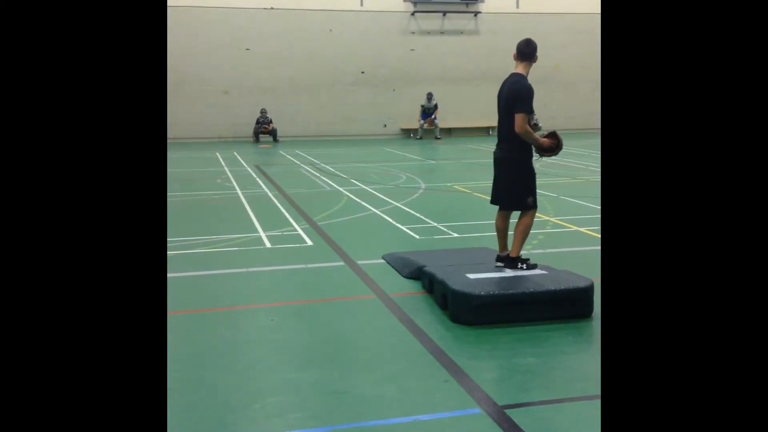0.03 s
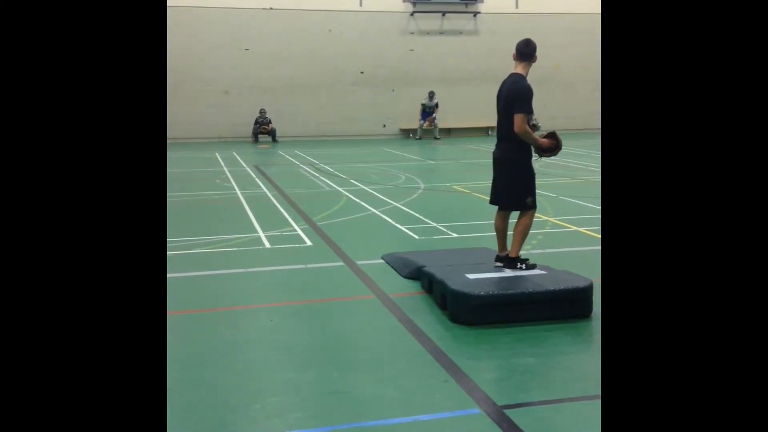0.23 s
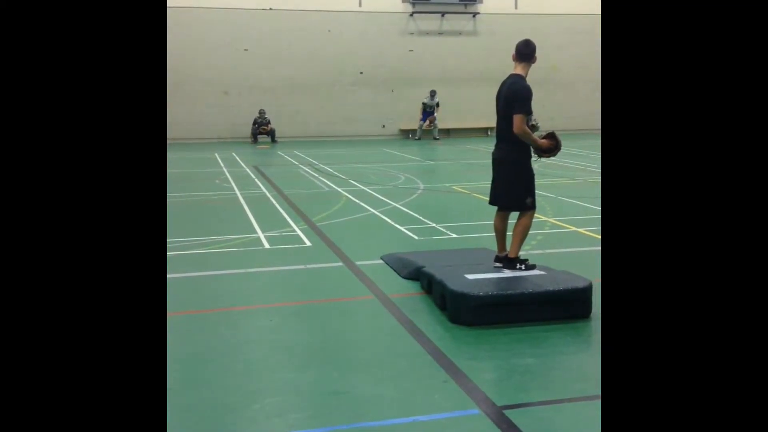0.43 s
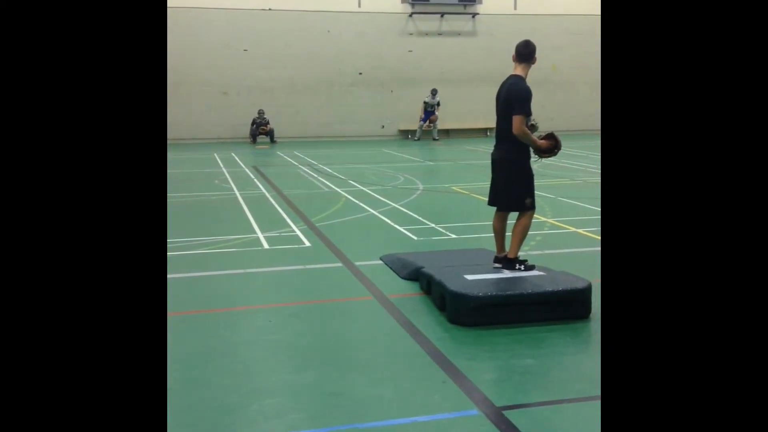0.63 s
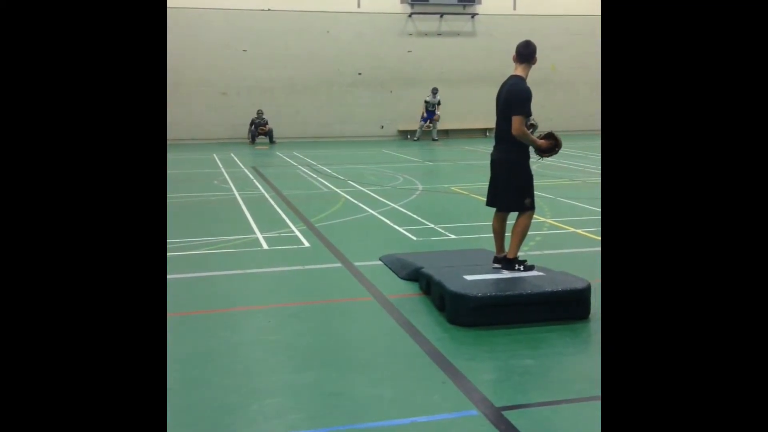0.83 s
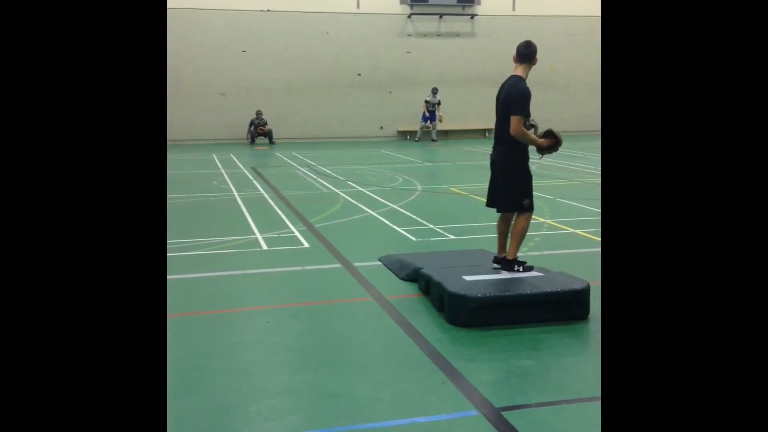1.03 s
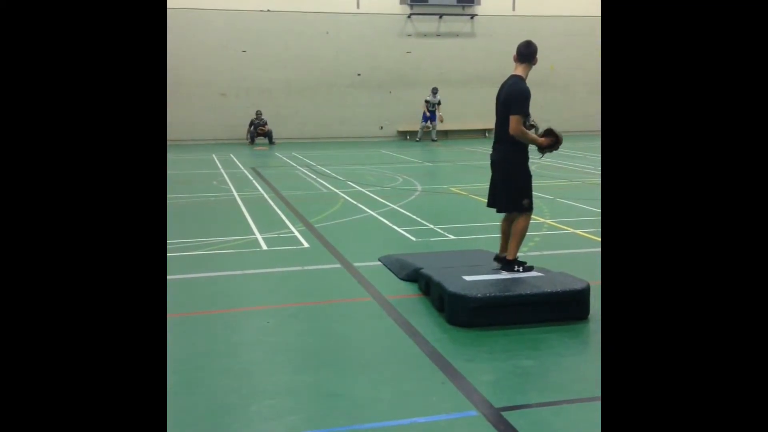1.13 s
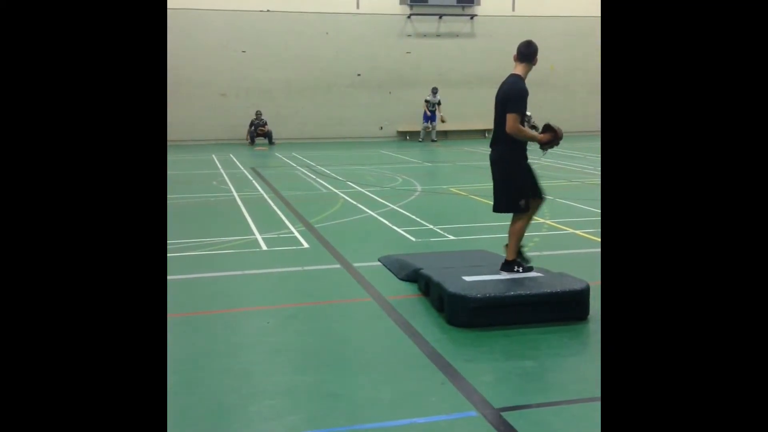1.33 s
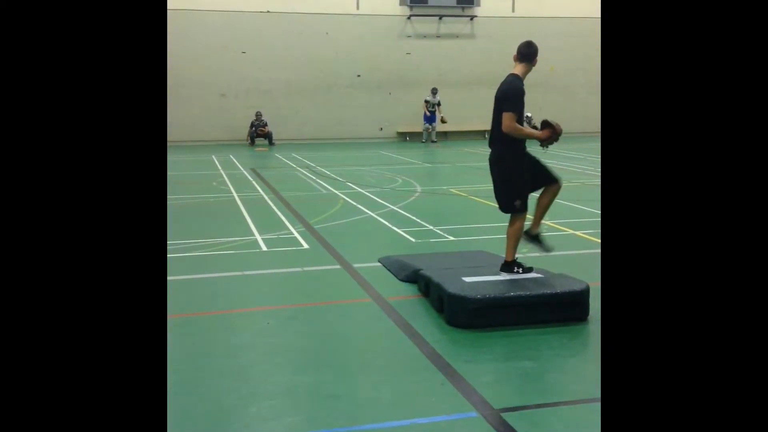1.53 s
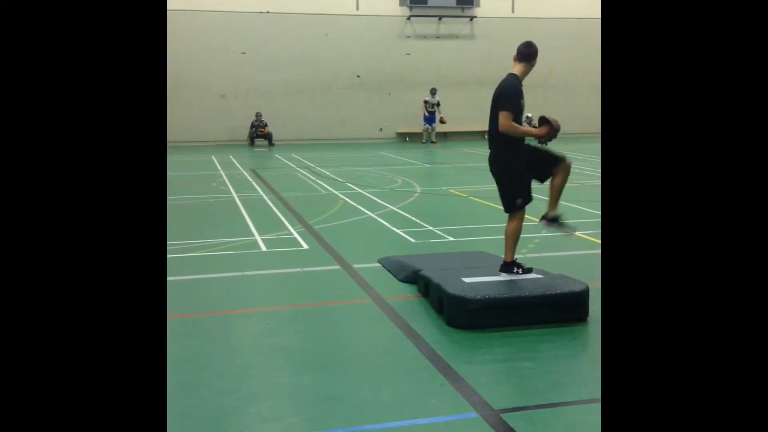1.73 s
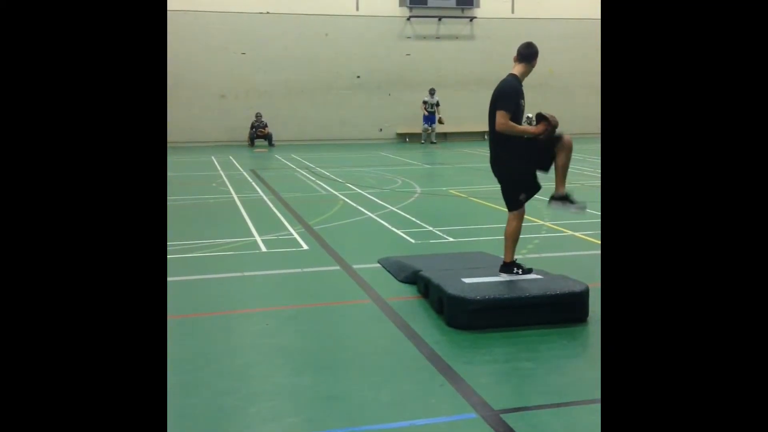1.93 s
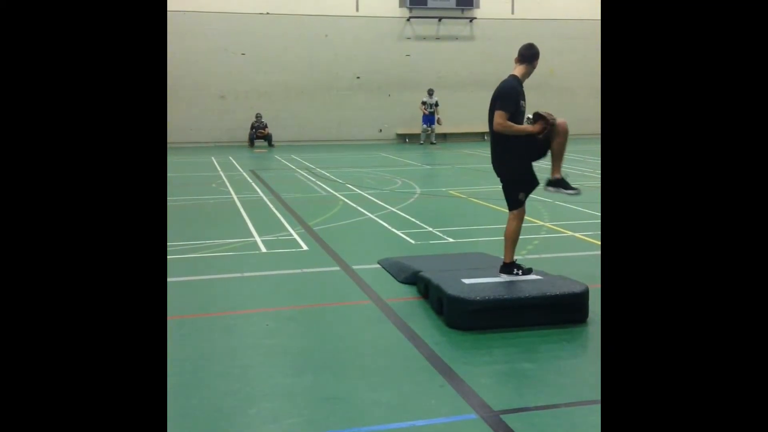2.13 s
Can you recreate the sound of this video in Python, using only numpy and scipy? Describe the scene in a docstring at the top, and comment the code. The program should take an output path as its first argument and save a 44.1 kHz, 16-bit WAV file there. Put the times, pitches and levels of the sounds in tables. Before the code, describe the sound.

A hard ball smacks into something close to the microphone with one sharp crack. Duller echoes come back from the walls of a large gym, which rings on while faint ticks sound over a low room rumble.

```python
"""Faint ticks over a low rumble, then a hard ball smacks into something close to the microphone in a
large gym: a crack and a second slap just after it, both ringing the struck thing's damped modes.
The walls throw the crack back, duller from far off, and the hall rings for seconds, the treble dying
first and the bass swelling late. The players' small knocks and rustling clothes sit low underneath.
One microphone; the recorder rounds off the peaks and cuts the top treble."""
import sys
import numpy as np
from scipy import signal
from scipy.fft import rfft, irfft
from scipy.io import wavfile
from scipy.ndimage import uniform_filter1d

SR = 44100
rng = np.random.default_rng(int(sys.argv[2]) if len(sys.argv) > 2 else 0)


def inscribe(sig):
    """Save sig as 16-bit PCM at rate SR to the path in sys.argv[1].

    A 1-D sig is mono; a 2-D sig holds one channel per row.
    Samples are clipped to [-1, 1] before scaling.
    """
    pcm = np.round(np.clip(np.atleast_2d(sig).T, -1, 1) * 32767)
    wavfile.write(sys.argv[1], SR, pcm.astype(np.int16))


N = 97020

# blows of the ball, close up, and how hard each drives the modes in four registers
# (time [s], crack level [dB], crack t60 [s], thud [dB], body [dB], knock [dB], ring [dB])
BLOWS = [(0.204, -16.5, 0.025, -27.5, -27.5, -19.5, -34.5), (0.2059, -10, 0.043, -22, -8, -19, -28.5),
         (.2178, -21, 0.025, -19, -31, -19, -19.5), (.2200, -14.5, 0.044, -12.5, -22.5, -19, -20)]
# centres of those registers (thud [Hz], body [Hz], knock [Hz], ring [Hz])
REGISTER_HZ = [140, 400, 1150, 3000]
# modes of the struck thing (frequency [Hz], level [dB], t60 [s])
STRUCK_MODES = [(89, -9, 0.032), (146, -0.5, 0.072), (376, 1.5, 0.07), (418.4, -6, 0.067),
                (672, -5.5, 0.076), (882, -11, 0.046), (1128, 3.5, 0.03), (1490, -7, 0.033),
                (1779, -6.5, 0.041), (2894, 0, 0.023), (3036, -5.5, 0.044), (4210, -15.5, 0.044),
                (5486, -20, 0.039)]
# colour of the crack (frequency [Hz], relative level [dB])
CRACK_SPECTRUM = [(30, -24), (120, 1), (300, 3.5), (700, -1.5), (1300, -1.5), (2100, -13), (3400, -9.5),
                  (5000, -18), (7600, -21.5)]
# the two slaps as they leave for the walls (time [s], level [dB], t60 [s])
SLAPS = [(0.2043, -12, 0.017), (0.2194, -14, 0.017)]
# wall echoes, near to far (delay [s], gain [dB], treble edge [Hz])
WALL_ECHOES = [(.058, -25.5, 6000), (.0685, -10.5, 3000), (0.078, -18.5, 3000), (0.125, -12.5, 2200),
               (0.214, -17.5, 1800), (.256, -8.5, 2500), (0.414, -15.5, 1400), (0.517, -13.5, 1600),
               (0.539, -14, 1200), (0.766, -18.5, 1300), (0.789, -16.5, 1300), (1.305, -22.5, 1200)]
# ring of the hall (frequency [Hz], relative starting level [dB], t60 [s])
HALL_BANDS = [(25, -23, 3.4), (45, -22.5, 1.7), (65, 4.5, 11), (88, 7, 8.5), (143, 1, 8.8), (204, -5, 5.6),
              (254, -6, 9), (350, -3.5, 9.5), (515, -10, 6.5), (850, -15, 7.6), (1065, -9, 5.18),
              (1500, -16.5, 5.12), (2120, -20.5, 3.37), (2830, -17.5, 1.55), (4130, -20.5, 1.04),
              (5300, -24, 0.85), (7940, -23.5, 0.48)]
# swell and sink of the hall's bass (time [s], gain [dB])
BASS_SWELL = [(.25, -5), (.31, -9), (.38, -8.5), (.46, -1.5), (.52, 1), (.59, 0.5), (.74, 3.5), (.84, 0.5),
              (.97, -4), (1.06, 0.5), (1.15, 5), (1.37, 0), (1.49, 5), (1.61, -1.5), (1.85, -0.5),
              (1.98, 2.5), (2.2, 6)]
# players' ticks and knocks (time [s], level [dB], centre [Hz], t60 [s], relative broadband click [dB])
TICKS = [(0.0443, -44.5, 1400, .02, -24.5), (0.056, -57, 1400, .025, -19), (0.112, -50, 1400, .025, -23),
         (0.155, -64.5, 4840, .012, -20), (1.205, -54, 3700, .015, -19), (1.2187, -48, 3100, .02, -13),
         (1.7683, -33, 1150, .025, -47.5)]
# rustles of clothing (time [s], level [dB], half length [s])
RUSTLES = [(0.062, -76, 0.022), (0.964, -75, 0.054), (1.222, -72, 0.014), (1.397, -75.5, .07),
           (1.72, -76, .035)]
# rumble and hiss of the room (frequency [Hz], relative level [dB])
ROOM_SPECTRUM = [(20, -20.5), (45, 0), (90, 11.5), (180, -4), (380, 2), (600, -7), (1200, -14),
                 (2000, -28.5), (3000, -35.5), (5000, -38), (7600, -40)]

ECHO_LOW_HZ, SCATTER_T60_S, SCATTER_DB = 277, 0.036, -4.5
HALL_DB, HALL_ONSET_S, HALL_RISE_S = -36.5, 0.225, 0.047
BASS_EDGE_HZ, PATCHY_DB, FLUTTER_DB = 160, 1, 0.54
TICK_WIDTH_OCT, TICK_ROOM_DB, TICK_ROOM_T60_S = 0.31, -4, 0.73
ROOM_DB, CEILING_DB, TREBLE_CUT_HZ = -48, -1.5, 7730


def ball_impact():
    """Close to the microphone, each blow makes a short crack and rings the same damped modes."""
    t, out = np.arange(SR // 4) / SR, np.zeros(N)
    for start, crack_db, crack_t60, *register_db in BLOWS:
        add(out, start, amp(crack_db) * crack(crack_t60))
        for hz, db, t60 in STRUCK_MODES:
            drive_db = np.interp(np.log(hz), np.log(REGISTER_HZ), register_db)
            mode = -np.sin(2 * np.pi * hz * t) * fade(t, t60)
            add(out, start, amp(db + drive_db) * mode)
    return out


def crack(t60):
    """The hard contact itself: a burst of noise with a very sharp front."""
    return burst(lambda f: amp(read(CRACK_SPECTRUM, f)), t60, rise_s=0.00041)


def wall_echoes():
    """The walls return the double slap from a distance, duller and partly scattered."""
    out = np.zeros(N)
    for delay, echo_db, edge_hz in WALL_ECHOES:
        wall = signal.butter(3, [ECHO_LOW_HZ, edge_hz], "band", fs=SR, output="sos")
        for start, slap_db, t60 in SLAPS:
            reflected = signal.sosfilt(wall, crack(t60)[:SR // 8])
            add(out, start + delay, amp(echo_db + slap_db) * reflected)
    return out + amp(SCATTER_DB) * scatter(out, SCATTER_T60_S)


def hall_ring():
    """The gym's diffuse ring: each band dies at its own speed, the bass swells, the level flutters."""
    frames = dict(nperseg=2048, noverlap=1792)
    hz, t, bands = signal.stft(rng.standard_normal(N), SR, **frames)
    hz = hz[:, None]
    patches = uniform_filter1d(rng.standard_normal(bands.shape), size=16, axis=0)  # across frequency
    patches = unit(uniform_filter1d(patches, size=8, axis=1))  # across time
    bass_share = np.exp(-(hz / BASS_EDGE_HZ) ** 2)
    swell_db = np.interp(t + HALL_ONSET_S, *np.transpose(BASS_SWELL)) * bass_share
    bands *= amp(read(HALL_BANDS, hz) + swell_db + PATCHY_DB * patches)
    bands *= fade(t, read(HALL_BANDS, hz, column=2))
    ring = signal.istft(bands, SR, **frames)[1][:N]
    flutter = unit(uniform_filter1d(uniform_filter1d(rng.standard_normal(N), size=500), size=200))
    build_up = np.minimum(np.arange(N) / SR / HALL_RISE_S, 1)
    out = np.zeros(N)
    add(out, HALL_ONSET_S, amp(HALL_DB) * unit(ring * amp(FLUTTER_DB * flutter) * build_up))
    return out


def player_ticks():
    """Small contacts from the players, each a broad resonance and a click with a little room on it."""
    out = np.zeros(N)
    for start, db, hz, t60, click_db in TICKS:
        tick = burst(lambda f: hump(f, hz, TICK_WIDTH_OCT) + amp(click_db), t60, rise_s=0.001)
        add(out, start, amp(db) * tick)
    return out + amp(TICK_ROOM_DB) * scatter(out, TICK_ROOM_T60_S)


def clothing_rustles():
    """Cloth slides softly as the player near the microphone moves."""
    t = np.arange(N) / SR
    level = sum(amp(db) * np.exp(-((t - peak) / half) ** 2) for peak, db, half in RUSTLES)
    return level * noise(lambda f: hump(f, hz=4000, octaves=0.6))


def room_tone():
    """The gym's steady rumble and faint hiss, behind everything."""
    return amp(ROOM_DB) * noise(lambda f: amp(read(ROOM_SPECTRUM, f)))


def amp(db):
    """Decibels to gain."""
    return 10 ** (np.asarray(db) / 20)


def unit(x):
    """Scales to rms 1."""
    return x / np.sqrt(np.mean(x ** 2) + 1e-20)


def read(table, hz, column=1):
    """One column of a table, interpolated along log frequency."""
    table = np.array(table)
    return np.interp(np.log(hz + 1), np.log(table[:, 0]), table[:, column])


def hump(f, hz, octaves):
    """Gain of a broad resonance around hz."""
    return np.exp(-.5 * (np.log2((f + 1) / hz) / octaves) ** 2)


def fade(t, t60):
    """Exponential decay, 60 dB in t60."""
    return np.exp(-np.log(1000) * t / t60)


def add(mix, start, sound):
    """Mixes a sound in at start seconds."""
    part = mix[max(round(start * SR), 0):][:len(sound)]
    part += sound[:len(part)]


def noise(gain):
    """Noise of rms 1 whose spectrum is shaped by gain(Hz)."""
    hz = np.fft.rfftfreq(N, 1 / SR)
    return unit(irfft(rfft(rng.standard_normal(N)) * gain(hz), N))


def burst(gain, t60, rise_s):
    """A short puff of coloured noise that rises and dies away."""
    t = np.arange(N) / SR
    return noise(gain) * np.minimum(t / rise_s, 1) * fade(t, t60)


def scatter(x, t60):
    """Smears a sound over a dying cloud of reflections of the same energy."""
    cloud = rng.standard_normal(N) * fade(np.arange(N) / SR, t60)
    return signal.fftconvolve(x, cloud / np.linalg.norm(cloud))[:N]


def scene():
    """At the microphone, in mono: the close impact, the gym's answer, the players and the room tone."""
    ball = ball_impact() + wall_echoes() + hall_ring()
    return (ball + player_ticks() + clothing_rustles() + room_tone())[None]


def record(dry):
    """The recorder rounds off the loudest peaks, then cuts the treble steeply."""
    rounded = amp(CEILING_DB) * np.tanh(dry / amp(CEILING_DB))
    lowpass = signal.firwin(401, TREBLE_CUT_HZ, window=("kaiser", 8), fs=SR)
    return signal.oaconvolve(rounded, lowpass[None], "same")


dry = scene()
out = record(dry)
inscribe(out)
```